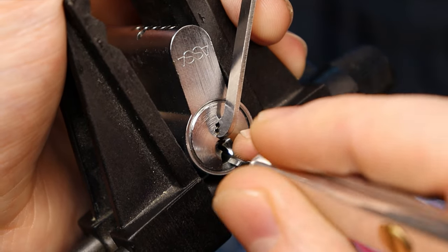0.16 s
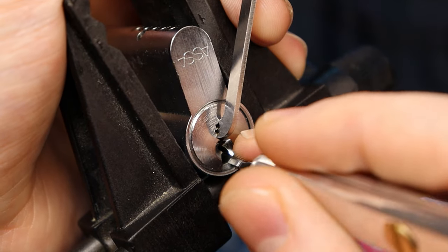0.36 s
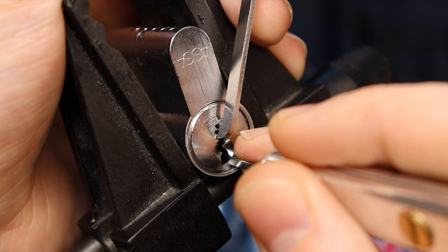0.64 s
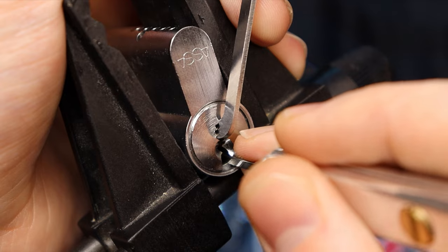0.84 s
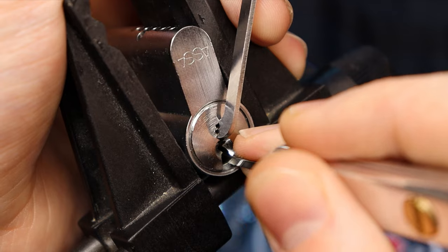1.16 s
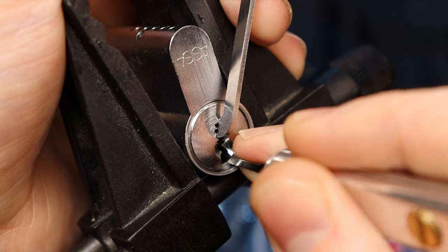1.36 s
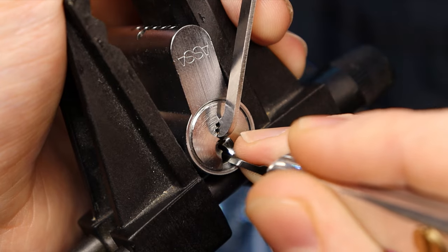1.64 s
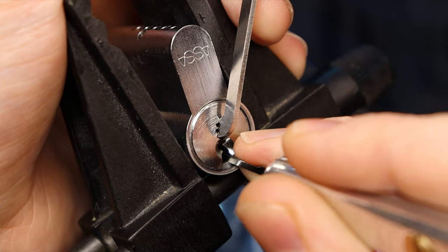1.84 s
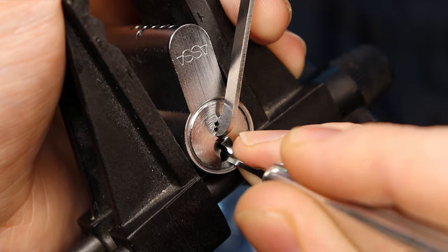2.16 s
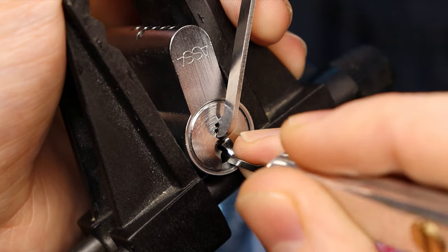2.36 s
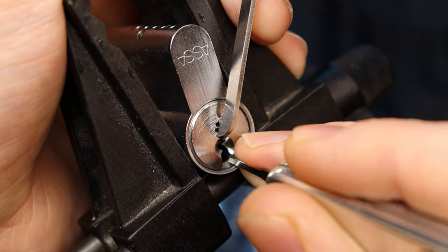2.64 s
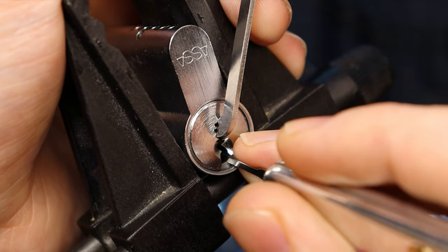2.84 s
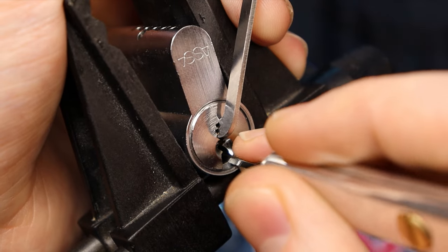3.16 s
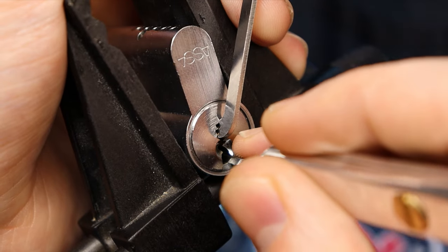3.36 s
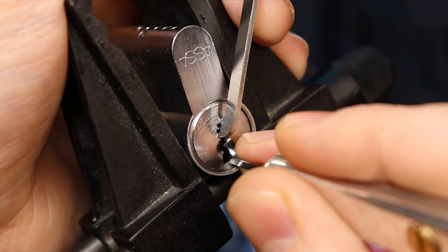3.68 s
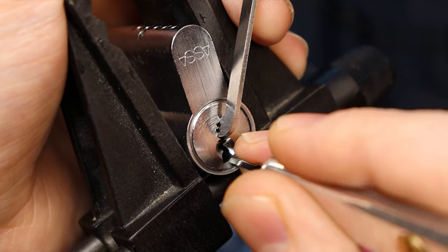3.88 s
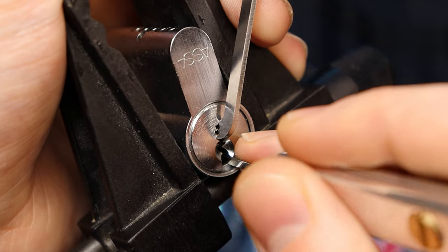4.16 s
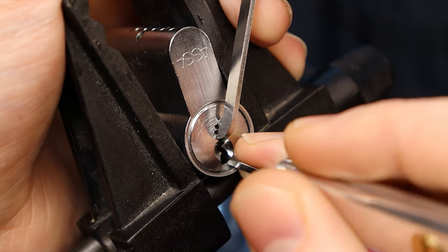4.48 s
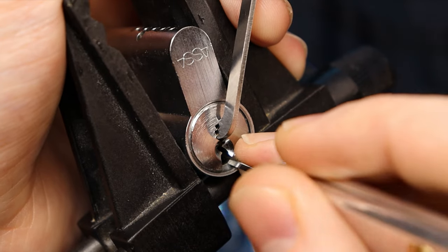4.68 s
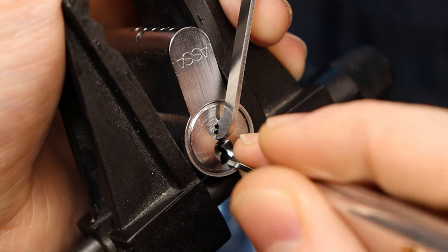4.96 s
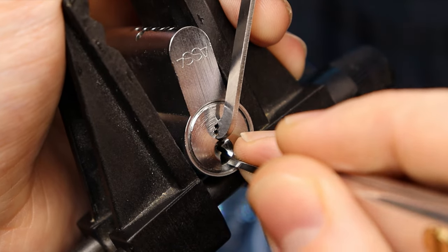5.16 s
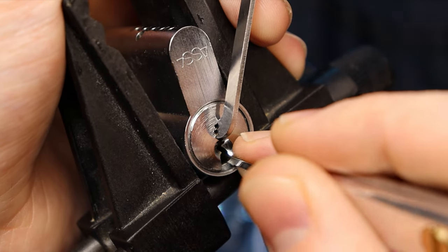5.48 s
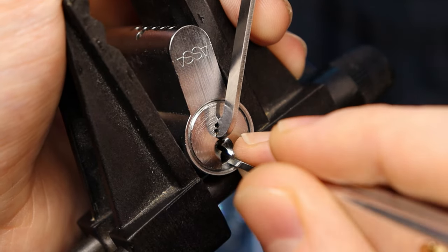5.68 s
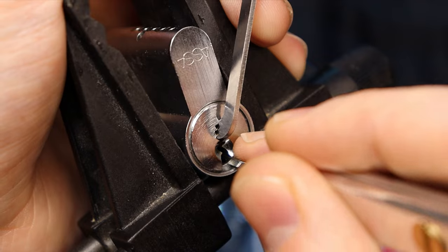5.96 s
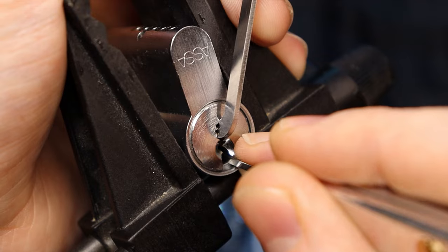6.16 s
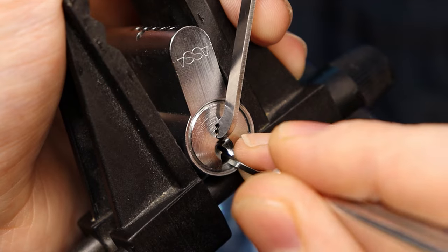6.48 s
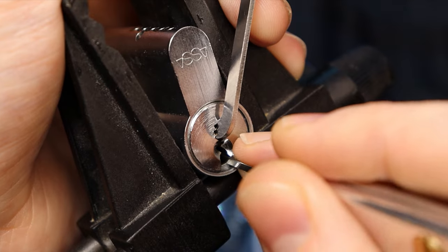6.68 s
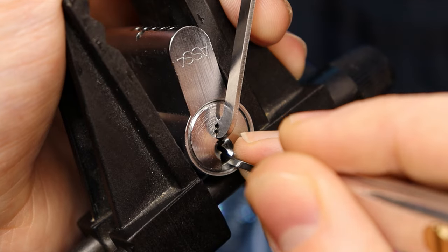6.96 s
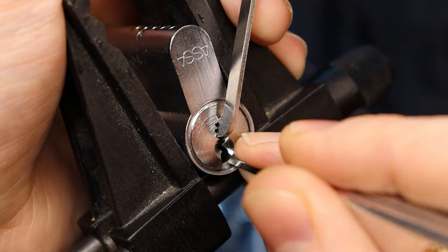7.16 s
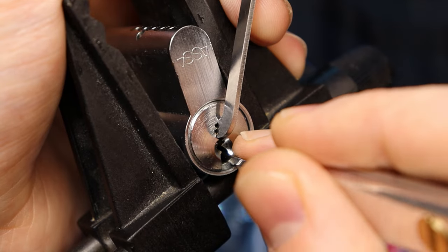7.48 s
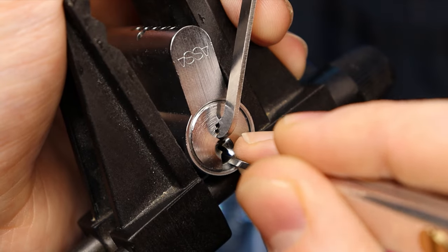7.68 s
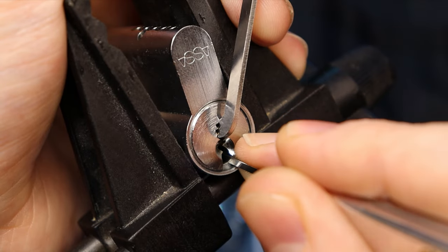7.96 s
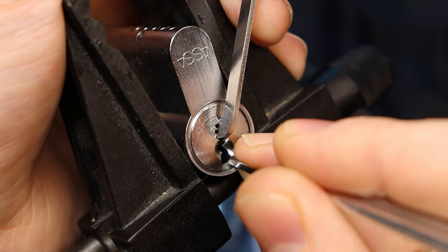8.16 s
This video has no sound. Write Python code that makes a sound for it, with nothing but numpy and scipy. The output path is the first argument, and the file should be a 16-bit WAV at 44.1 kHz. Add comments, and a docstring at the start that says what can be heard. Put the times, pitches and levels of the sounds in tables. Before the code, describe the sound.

Over the soft, steady hum of a fan in a small room, lock pins tick faintly and unevenly under a metal pick, heard up close. Twice the pick slips off a pin with a crisp, briefly ringing click, the first louder and backed by a small thud of the vice. Shortly before the second click, a low drone like a distant engine comes in and throbs gently beneath the remaining ticks.

```python
"""A fan hums steadily in a small room, a low drone comes and goes, and the pins of a lock tick faintly.
A steel pick is working a lock cylinder clamped in a vice, close to the listener. Each contact is a burst
of micro-bounces that excites the modes of lock and pick. Twice the pick snaps off a pin: the lock rings
for a few milliseconds, the pick sings and the vice thuds. The vice also thuds at two fainter contacts.
Bench and room add a short echo."""
import sys
import numpy as np
from scipy import signal
from scipy.fft import rfft, irfft
from scipy.io import wavfile

SR = 44100
rng = np.random.default_rng(int(sys.argv[2]) if len(sys.argv) > 2 else 0)


def digitize_waveform(pressure):
    """Quantize a signal to 16-bit integers and store it at the path in sys.argv[1].

    Rows of a 2-D input are taken as channels; values are limited to [-1, 1].
    """
    field = np.atleast_2d(pressure).T
    bounded = np.clip(field, -1, 1)
    quanta = np.round(bounded * 32767).astype(np.int16)
    wavfile.write(sys.argv[1], SR, quanta)


N = 367353
TIME = np.arange(N) / SR
BIN_HZ = np.maximum(np.arange(N // 2 + 1) * SR / N, 1)


def from_db(db):
    """The decibel scale: 20 dB is a factor of ten in amplitude."""
    return 10 ** (np.asarray(db) / 20)


def unit_energy(x):
    """Energy normalisation: the squares of each channel sum to one."""
    return x / np.sqrt(np.sum(x ** 2, axis=-1, keepdims=True) + 1e-20)


def at_hz(points, hz):
    """Interpolation of a table on a logarithmic frequency axis."""
    freqs, values = np.transpose(points)
    return np.interp(np.log(hz), np.log(freqs), values)


def panned(lean_db):
    """Interaural level difference: two gains, the left lean_db above the right."""
    return from_db(np.array([[.5], [-.5]]) * lean_db)


def add(track, start_s, sound):
    """Superposition: a sound adds to the track from its onset."""
    start = round(start_s * SR)
    part = sound[..., :N - start]
    track[:, start:start + part.shape[-1]] += part


def drift(rate_hz):
    """Slow random fluctuation: low-passed noise of unit variance."""
    slow = irfft(rfft(rng.standard_normal(N)) / (1 + (BIN_HZ / rate_hz) ** 2), N)
    return slow / slow.std()


def tone(hz, level_db, waver_hz, flutter_db):
    """Random frequency and amplitude modulation of a sine about an rms level."""
    phase = 2 * np.pi * np.cumsum(hz + waver_hz * drift(2.86)) / SR
    return np.sqrt(2) * from_db(level_db + flutter_db * drift(8)) * np.sin(phase)


def resonate(force, hz, width_hz):
    """Forced response of one damped mode, scaled to unit energy."""
    radius = np.exp(-np.pi * width_hz / SR)
    feedback = [1, -2 * radius * np.cos(2 * np.pi * hz / SR), radius * radius]
    return unit_energy(signal.lfilter([1, 0, -1], feedback, force))


def fan_air():
    """Broadband flow noise shaped by resonances: the bass is coherent between the ears, the hiss is not."""
    # base spectrum of the rushing air; the last point is the band limit, cutting the hiss near 16 kHz:
    # (frequency [Hz], spectral density [dB])
    base_spectrum = [(20, -110), (32, -87), (50, -83.5), (95, -82), (200, -73.5), (330, -80), (520, -81),
                     (730, -86), (1500, -92), (2800, -97.5), (5000, -105), (9500, -110.5), (15650, -110),
                     (16000, -134)]
    # resonances that colour the noise: (frequency [Hz], width [Hz], lift [dB])
    air_peaks = [(142.3, 36, 10.5), (208.6, 35, 8), (250.7, 46.6, 6), (369, 25, 4), (449, 83, 8.5),
                 (602, 46, 6), (860, 99, 2.5), (1050, 67, 5), (1284, 16, 4), (2410, 225, 5.5),
                 (3900, 350, 2), (9240, 190, 2.5), (11500, 690, 3.5), (12660, 210, 2), (13900, 500, 2.5),
                 (14800, 290, 6.5)]
    # stereo width: (frequency [Hz], side minus mid [dB])
    spread = [(60, -10.5), (120, -26), (220, -13.5), (400, -17.5), (700, -4.5), (1300, -1), (2400, 1),
              (15000, -1.5)]
    # balance: (frequency [Hz], left minus right [dB])
    lean = [(60, -1), (200, 2), (700, 1.5), (1300, -1), (2400, -4.5), (4400, -0.5), (8000, .5), (15000, -2)]
    lift_db = sum(db * np.exp2(-(2 * (BIN_HZ - hz) / width) ** 2) for hz, width, db in air_peaks)
    density_db = at_hz(base_spectrum, BIN_HZ) + lift_db
    mid, side = rfft(rng.standard_normal((2, N))) * from_db(density_db) * np.sqrt(SR / 2)
    side = side * from_db(at_hz(spread, BIN_HZ))
    return irfft(np.array([mid + side, mid - side]) * panned(at_hz(lean, BIN_HZ)), N)


def fan_hum():
    """The fan's line spectrum: one main tone and a few faint ones, all wavering slightly."""
    # fainter tones: (frequency [Hz], rms level [dB])
    faint_tones = [(354, -72.5), (467.5, -67.5), (599, -76.5), (720, -93), (840, -69.5)]
    main = tone(hz=210.6, level_db=-54.5, waver_hz=1.65, flutter_db=2.5)
    return main + sum(tone(hz, db, waver_hz=1.514, flutter_db=2.5) for hz, db in faint_tones)


def drones(settle_s=.33, throb_period_s=1.14):
    """Amplitude-modulated low tones that swell, sag in pitch and fade, like engines far outside."""
    # drones: (start [s], end [s], attack [s], release [s], first pitch [Hz], settled pitch [Hz],
    # rms level [dB], throb depth [dB])
    swells = [ (0, 3.8, 0.046, 1.4, 42, 40.9, -66, 1), (5.1, 5.65, 0.13, 0.15, 161.7, 136.4, -49, 0.4),
              (5.5, 8.6, .6, 0.27, 70, 62.4, -56, 2.5), ]
    out = 0
    for start, end, attack, release, first_hz, settled_hz, db, throb_db in swells:
        age = np.maximum(TIME - start, 0)
        envelope = np.clip(np.minimum(age / attack, (end - TIME) / release), 0, 1)
        hz = settled_hz + (first_hz - settled_hz) * np.exp(-age / settle_s)
        level_db = db + throb_db * np.cos(2 * np.pi * age / throb_period_s)
        out = out + envelope * tone(hz, level_db, waver_hz=0.33, flutter_db=0.7)
    return out


def room(sound, tail_db=-20.5, tail_gap_s=0.0064, scatter_db=-15.5, scatter_gap_s=0.0025):
    """Reverberation: early scatter from bench and hands, then a diffuse tail decaying band by band."""
    # decay of the room: (frequency [Hz], reverberation time [s])
    room_t60 = [(200, 0.42), (2000, 0.19), (7000, 0.27), (14000, 0.12)]
    scatter_t60_s = 0.033
    t, tail = np.arange(SR // 2) / SR, 0
    edges_hz = np.geomspace(100, 18000, 8)
    for low, high in zip(edges_hz, edges_hz[1:]):
        bandpass = signal.butter(2, [low, high], "band", fs=SR, output="sos")
        band = signal.sosfilt(bandpass, rng.standard_normal((2, len(t))))
        tail = tail + band * from_db(-60 * t / at_hz(room_t60, np.sqrt(low * high)))
    tail = unit_energy(tail * np.clip(t / tail_gap_s - 1, 0, 1))
    scatter = rng.standard_normal((2, len(t))) * from_db(-60 * t / scatter_t60_s)
    scatter = unit_energy(scatter * np.clip(t / scatter_gap_s - 1, 0, 1))
    response = from_db(tail_db) * tail + from_db(scatter_db) * scatter
    return signal.fftconvolve(sound, response, axes=-1)[:, :N]


def vice_thuds():
    """Impulse excitation: as the pick gives way, a smooth push and rebound drives the heavy vice."""
    # jolts: (time [s], level [dB], pitch factor [ratio])
    jolts = [(2.1253, -2.5, 1.03), (3.0475, -14, 0.99), (6.0060, -14.5, 2.3), (8.0081, -10, 0.76)]
    # modes of vice and bench: (frequency [Hz], bandwidth [Hz], level [dB])
    vice_modes = [(175, 82, -16), (197, 39, -3), (430, 140, -11.5)]
    out, t = np.zeros((2, N)), np.arange(SR // 4) / SR
    shove = np.gradient(t * t * np.exp(-t / 0.00058))
    for start_s, level_db, pitch in jolts:
        thud = sum(from_db(db + level_db) * resonate(shove, hz * pitch, width * pitch)
                   for hz, width, db in vice_modes)
        add(out, start_s, thud)
    return out


def chatter(slip_s, shortest_t60_s=0.0086, ear_correlation=0.39):
    """Contact noise: dense micro-bounces that build and decay more slowly after a longer slip."""
    t = np.arange(SR // 4) / SR
    t60_s = shortest_t60_s + 4.5 * slip_s
    common, left, right = rng.standard_normal((3, len(t)))
    bounces = np.sqrt(ear_correlation) * common + np.sqrt(1 - ear_correlation) * np.array([left, right])
    return bounces * (1 - np.exp(-t / slip_s)) * from_db(-60 * t / t60_s)


def contact_db(hz, tilt, favoured_hz, pivot_hz=5040, lift_db=9, reach_octaves=0.454):
    """Modal weighting: a harder contact favours the treble, the point of contact one group of modes."""
    hardness_db = tilt * np.log2(hz / pivot_hz)
    position_db = lift_db * np.exp2(-(np.log2(hz / favoured_hz) / reach_octaves) ** 2)
    return hardness_db + position_db


def pin_ticks():
    """Modal superposition: the chatter of each tick or snap rings both the lock and the pick."""
    # pick on pin: (time [s], lock level [dB], hardness tilt [dB/octave], favoured frequency [Hz],
    # pick level [dB], lock pitch factor [ratio], slip [s], left minus right [dB])
    contacts = [ (0.0723, -45, -5, 9000, -43, 1.05, .0003, -3),
                (1.4954, -46.5, -5, 2560, -32, 1.06, 0.00027, -4),
                (1.7234, -39.5, -5, 13000, -33, 0.88, .0002, -2),
                (2.1257, -8.5, 1.9, 15000, 8, 0.98, .00009, -3),
                (2.1280, -12.5, -1.5, 5340, 3, 0.97, .0011, -1.5),
                (2.4173, -42, -4.5, 8450, -42, 0.96, .0002, -5),
                (2.6116, -43, -1, 2080, -25.5, 1, .0003, -2),
                (3.0474, -37.5, -1, 1900, -16.5, 0.95, 0.00052, -4.5),
                (3.272, -41.5, 1.5, 10500, -41, 1, .0001, -3),
                (5.334, -49, -8, 2110, -60, 1.12, .00035, -3),
                (6.005, -19.5, 1.5, 2660, 4, 0.96, 0.00041, -5),
                (6.2773, -43.5, -3, 2200, -30, 0.79, .0003, -3),
                (6.4395, -45, 8, 4000, -49, 0.95, .0001, -4),
                (6.6322, -31.5, 4.5, 4480, -41, 1.2, 0.00036, -3),
                (8.0083, -35, -2.5, 2080, -27, 0.966, .0002, -3),
                (8.2624, -36, -3.5, 10200, -48, 1.05, .0001, 0), ]
    # modes of lock body and wrench: (frequency [Hz], bandwidth [Hz], level [dB])
    lock_modes = [(1110, 250, -0.5), (1357, 190, 3), (2070, 550, 6), (2343, 240, 5), (2690, 79, 1.5),
                  (3460, 230, 5.5), (3960, 530, -1), (4370, 200, -0.5), (5440, 600, -0.5), (5960, 280, 3),
                  (6610, 190, -0.5), (7090, 200, -4.5), (8520, 466, -0.5), (8780, 250, 0.5),
                  (9900, 1500, 6), (11870, 590, 1.5), (11800, 620, 4.5), (13470, 400, 2.5),
                  (14400, 450, 4.5), (15500, 450, 3.5)]
    # modes of the pick's blade: (frequency [Hz], bandwidth [Hz], level [dB])
    pick_modes = [(6860, 180, -2.5), (7060, 25, -30), (7300, 27, -24), (8140, 120, -28)]
    out = np.zeros((2, N))
    for start_s, lock_db, tilt, favoured_hz, pick_db, lock_pitch, slip_s, lean_db in contacts:
        force = chatter(slip_s)
        lock = 0
        for k, (hz, width, db) in enumerate(lock_modes):
            shifted_hz = hz * lock_pitch   # the modes shift with the pin that is touched
            gain = from_db(db + lock_db + contact_db(shifted_hz, tilt, favoured_hz))
            lock = lock + (-1) ** k * gain * resonate(force, shifted_hz, width)
        pick = sum(from_db(db + pick_db) * resonate(force, hz, width) for hz, width, db in pick_modes)
        add(out, start_s, (lock + pick) * panned(lean_db))
    return out


def scene(left_lag_s=.0001):
    """Superposition of direct sound, its echo and a background that reaches the left ear later."""
    direct = pin_ticks() + vice_thuds()
    left, right = fan_air() + (fan_hum() + drones()) * panned(lean_db=0.88)
    background = np.array([np.roll(left, round(left_lag_s * SR)), right])
    return direct + room(direct) + background


def record(dry):
    """Clipping and band limiting: peaks stop at full scale, then a steep low-pass cuts the top."""
    cutoff_hz = 16500
    lowpass = signal.ellip(10, .1, 80, cutoff_hz, fs=SR, output="sos")
    return signal.sosfilt(lowpass, np.clip(dry, -1, 1))


dry = scene()
out = record(dry)
digitize_waveform(out)
```